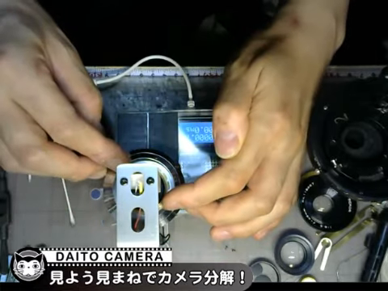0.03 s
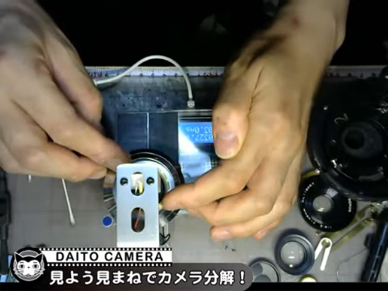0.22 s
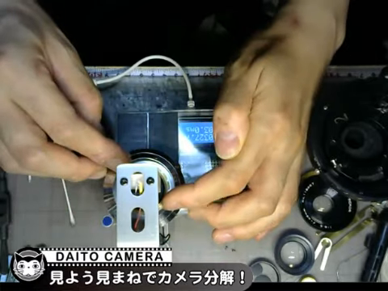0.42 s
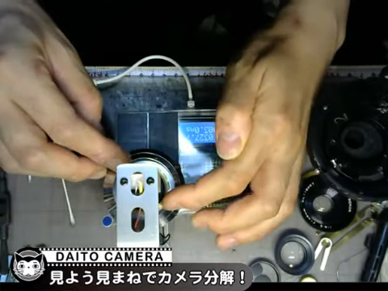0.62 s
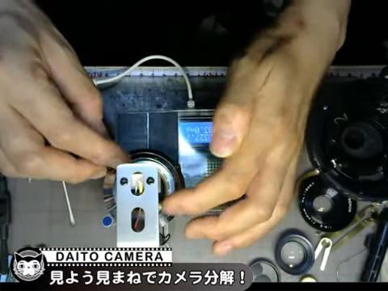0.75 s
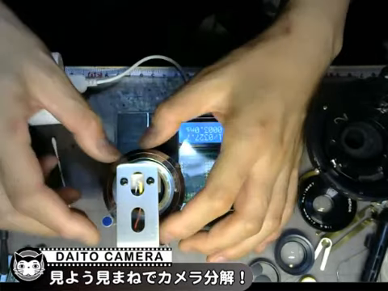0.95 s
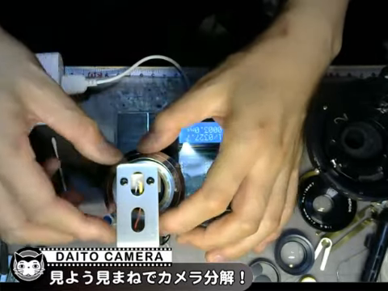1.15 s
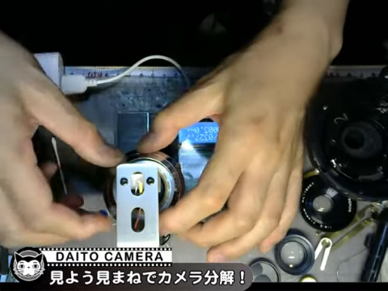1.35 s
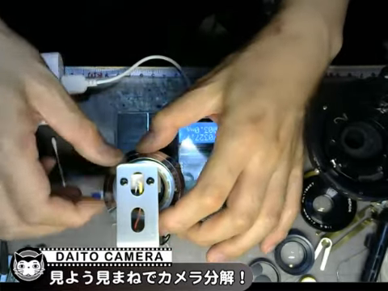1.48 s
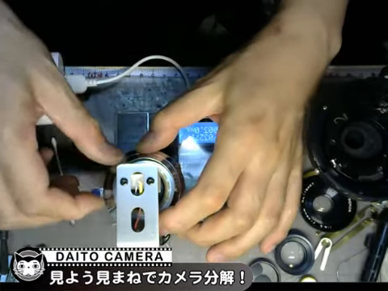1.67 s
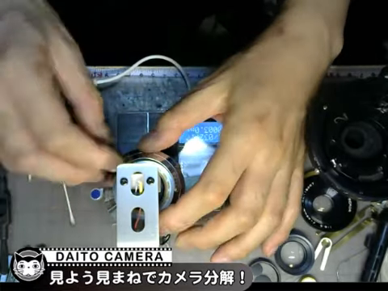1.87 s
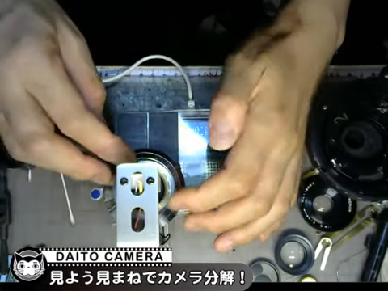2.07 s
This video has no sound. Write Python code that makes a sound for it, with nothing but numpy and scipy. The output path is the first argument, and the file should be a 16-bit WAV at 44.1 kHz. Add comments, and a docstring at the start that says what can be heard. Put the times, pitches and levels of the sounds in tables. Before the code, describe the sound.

A camera lens shutter fires at about 0.2 seconds with one sharp, metallic click, close and much louder than everything else. Faint handling ticks follow near 0.6, 1.1 and 1.4 seconds. Around 1.5 to 1.7 seconds the lens shifts with a short, soft scrape and a few clicks, then ticks lightly near 1.8 and 2 seconds. A faint low rumble of a small room lies underneath.

```python
"""A sharp metallic snap, then light ticks and short scrapes over a low room rumble.
The snap is a camera's leaf shutter on a workbench: the latch lets go, the blades fly open and shut,
and each impact sets the metal and the lens body into damped free vibration. Fingers then shift the
lens, exciting its barrel by contact and by stick-slip friction. A small room adds its reflections,
and a close, narrow-band microphone overloads on the snap."""
import sys
import numpy as np
from scipy import signal
from scipy.fft import rfft, irfft, next_fast_len
from scipy.io import wavfile

SR = 44100
rng = np.random.default_rng(int(sys.argv[2]) if len(sys.argv) > 2 else 0)


def inscribe(sig):
    """Save sig as 16-bit PCM at rate SR to the path in sys.argv[1].

    A 1-D sig is mono; a 2-D sig holds one channel per row.
    Samples are clipped to [-1, 1] before scaling.
    """
    pcm = np.round(np.clip(np.atleast_2d(sig).T, -1, 1) * 32767)
    wavfile.write(sys.argv[1], SR, pcm.astype(np.int16))


N = 92610

# impacts inside the shutter: t/s, metal level/dB, body level/dB, favoured f/Hz
SHUTTER_IMPACTS = [(0.2105, -13, -17.5, 2900), (0.2131, -19.5, -21.5, 2800), (0.2152, -3.5, -2.5, 5404),
                   (0.2167, 1.5, -7.5, 3157), (0.2192, 2.5, -2, 2700), (.2226, -6, -3, 2550),
                   (0.2274, -13, -17.5, 2700), (0.2367, -19, -22, 1950)]
# modes of the shutter's metal: f/Hz, level/dB, T60/s
METAL_MODES = [(1658, -18.5, 0.036), (1975, -21.5, 0.051), (2417, -17, 0.083), (2719, -12, .028),
               (2908, -9.5, 0.01), (3294, -12, 0.035), (3376, -18, 0.0182), (3840, -17.5, .02),
               (5190, -27.5, 0.02), (5670, -22, .025), (6010, -20, .028), (6720, -20.5, .025)]
# modes of the lens body, its stand and the bench: f/Hz, level/dB, T60/s
BODY_MODES = [(114, -44, 0.38), (308, -22, 0.037), (528, -17, .046), (705.5, -18, 0.051),
              (1030, -25, 0.037)]
# spectrum of the blades' rattle: f/Hz, level/dB
RATTLE_SPECTRUM = [(40, -28), (150, -24), (300, -12.5), (500, -8.5), (900, -9.5), (1500, -7), (2900, -4),
                   (4100, -4), (4700, -13.5), (5600, -8), (7200, -7.5)]
# finger touches: t/s, chatter T60/s, chatter level/dB relative to the first contact, favoured f/Hz,
# then level/dB at each of the five tick bands
TOUCHES = [(0.6109, .006, -7, 2700, -63, -65, -46, -48, -58),
           (0.6445, .012, 2, 2750, -60, -54, -42.5, -39, -39),
           (1.0735, 0.015, 4, 3400, -42, -42, -56, -48.5, -61),
           (1.1178, 0.021, 3.5, 420, -44, -56, -54, -50, -73),
           (1.2151, 0.024, -8, 2500, -60, -51, -47, -45, -55),
           (1.3816, .009, -5.5, 3100, -43, -38, -28, -36, -42),
           (1.4162, .008, -1, 2990, -41, -67, -54, -56.5, -55),
           (1.6038, 0.013, 5.5, 3400, -42.5, -31.5, -37, -37, -43.5),
           (1.6114, 0.0064, 11, 3580, -45, -42, -49.5, -38.5, -55),
           (1.6385, 0.034, 7, 3880, -48, -38, -40.5, -32, -34.5),
           (1.6498, 0.02, 2, 2750, -38.5, -40, -29.5, -29.5, -38),
           (1.7633, 0.015, -8, 2850, -39.5, -65, -52, -41, -45),
           (1.8064, 0.0057, -6.5, 1867, -40.5, -50, -30, -36, -50),
           (2.0436, 0.011, 1, 2150, -42, -53, -40, -38.5, -57)]
# tick bands (thud, knock, low ring, middle ring, treble): f/Hz
TOUCH_BANDS_HZ = [500, 1300, 1900, 3200, 6200]
# slides of the barrel in its seat: t/s, T60/s, level/dB, treble gain/dB
SLIDES = [(.622, 0.11, -56.5, -10), (1.5, 0.25, -53.5, 3.5), (1.532, 0.11, -52, -16),
          (1.546, 0.18, -50, -5), (1.574, 0.16, -44, -7), (1.593, 0.13, -39, -5), (1.811, 0.56, -57, -17)]
# modes of the lens barrel: f/Hz, level/dB, T60/s
BARREL_MODES = [(289, -4.5, .03), (575, -3, 0.018), (1413, -2.5, 0.011), (1924, -2, 0.019),
                (2500, -4.5, 0.011), (2780, -4, 0.016), (3140, -6, 0.016), (3361, -7.5, 0.022),
                (3893, -3.5, 0.0084), (5690, -3.5, 0.0061), (6280, -8.5, 0.021), (6920, -2, 0.0033)]
# spectrum of the room's reflections: f/Hz, level/dB
ECHO_SPECTRUM = [(100, -11), (500, -1), (1200, -1.5), (3000, -1.5), (7000, -1.5)]
# spectral density of the room noise: f/Hz, relative level/dB
NOISE_SPECTRUM = [(20, -7), (35, -8.5), (60, -6), (100, -2), (160, -6), (300, -5), (500, -10),
                  (1000, -15.5), (2000, -21.5), (4000, -28.5), (6500, -33.5), (7500, -40.5)]


def shutter():
    """Impact excitation: each blow rings the metal, rattles the blades and nudges the lens body."""
    out, metal, body = np.zeros(N), ring(METAL_MODES), ring(BODY_MODES)
    for start, metal_db, body_db, hz in SHUTTER_IMPACTS:
        rattle = undb(22) * colour(chatter(t60=0.014), RATTLE_SPECTRUM)
        snap = favour(metal + rattle, hz, db=5.5, octaves=.35)
        add(out, start, undb(metal_db) * snap + undb(body_db) * body)
    return out


def ticks():
    """Convolution: the force of a touch and its chatter drives the barrel's impulse response."""
    out, response = np.zeros(N), barrel()
    for start, t60, chatter_db, hz, *band_db in TOUCHES:
        force = undb(chatter_db) * chatter(t60)
        force[0] += 1  # first contact
        vibration = signal.fftconvolve(force, response)[:N // 4]
        tick = favour(vibration, hz, db=6.5, octaves=0.2)
        add(out, start, colour(tick, list(zip(TOUCH_BANDS_HZ, band_db))))
    return out


def scrapes(slips_per_s=4000, attack_s=0.0012):
    """Stick-slip friction: the barrel breaks free in jerks, each a dying train of tiny slips."""
    out, response, size = np.zeros(N), barrel(), N // 4
    attack = 1 - np.exp(-np.arange(size) / SR / attack_s)
    for start, t60, db, treble_db in SLIDES:
        slips = (rng.random(size) < slips_per_s / SR) * rng.standard_normal(size)
        vibration = signal.fftconvolve(slips, response)[:size]
        rasp = colour(vibration, [(500, -11), (1900, -2), (3400, 1), (6000, treble_db)])
        add(out, start, undb(db) * rasp / rasp.std() * attack * fade(t60))
    return out


def barrel():
    """Impulse response of a small radiator: a crack and short-lived modes, weak in the bass."""
    response = ring(BARREL_MODES)
    response[0] += undb(8.5)  # the crack
    return colour(response, [(100, -12), (300, 0)])


def ring(modes):
    """Modal superposition: damped sinusoids after one tap, neighbours in opposite phase."""
    t = np.arange(N // 4) / SR
    return sum((-1) ** k * undb(db) * np.sin(2 * np.pi * hz * t) * fade(t60)
               for k, (hz, db, t60) in enumerate(modes))


def chatter(t60):
    """Broadband excitation: a dying run of tiny contacts, of even spectrum and unit energy."""
    phase = np.angle(rfft(burst(t60)))
    contacts = irfft(np.exp(1j * phase), N // 4) * fade(10 * t60)
    return contacts / np.linalg.norm(contacts)


def favour(x, hz, db, octaves):
    """Selective excitation: the point of contact lifts the modes within `octaves` either side of hz."""
    return colour(x, [(hz / 2 ** octaves, 0), (hz, db), (hz * 2 ** octaves, 0)])


def room(direct, build_s=.008):
    """Reverberation: quick reflections from the bench and a faint tail from the walls."""
    build = 1 - np.exp(-(np.arange(N // 4) / SR / build_s) ** 2)
    early = undb(-11.5) * burst(t60=.115)
    late = undb(-35) * burst(t60=.25)
    echo = colour(build * (early + late), ECHO_SPECTRUM)
    return direct + signal.fftconvolve(direct, echo)[:N]


def room_noise(rms_db=-53):
    """Stationary noise: the workshop's low rumble and faint hiss."""
    noise = colour(rng.standard_normal(N), NOISE_SPECTRUM)
    return noise / noise.std() * undb(rms_db)


def colour(x, points):
    """Minimum-phase filtering: a causal response through (f/Hz, level/dB) points."""
    hz, db = np.array(points).T
    size = 2 * next_fast_len(len(x))
    f = np.maximum(np.fft.rfftfreq(size, 1 / SR), 1)
    gain = undb(np.interp(np.log(f), np.log(hz), db))
    cepstrum = irfft(np.log(gain))
    cepstrum[1:size // 2] *= 2  # fold onto positive time
    cepstrum[size // 2 + 1:] = 0
    return irfft(rfft(x, size) * np.exp(rfft(cepstrum)))[:len(x)]


def burst(t60):
    """Damped white noise of unit energy."""
    noise = rng.standard_normal(N // 4) * fade(t60)
    return noise / np.linalg.norm(noise)


def fade(t60):
    """Exponential damping: 60 dB in t60 seconds."""
    return np.exp(-np.log(1000) * np.arange(N // 4) / SR / max(t60, 1e-4))


def undb(db):
    """Amplitude ratio of a level in decibels."""
    return 10 ** (np.asarray(db) / 20)


def add(out, start, x):
    """Superposition: x joins the mix at `start` seconds."""
    i = int(start * SR)
    out[i:i + len(x)] += x[:N - i]


def scene():
    """Linear superposition: shutter and handling sound in one room, over its steady noise."""
    return (room(shutter() + ticks() + scrapes()) + room_noise())[None]


def record(dry, mic_top_hz=7222, overload=.78, top_hz=16000, dc_offset=.0061):
    """Band limiting and saturation: a narrow-band microphone, soft clipping, a top cut and an offset."""
    mic = signal.sosfilt(signal.ellip(8, .3, 70, mic_top_hz, fs=SR, output="sos"), dry)
    clipped = mic / (1 + (mic / overload) ** 8) ** (1 / 8)
    top_cut = signal.ellip(8, .1, 60, top_hz, fs=SR, output="sos")
    return signal.sosfiltfilt(top_cut, clipped) + dc_offset


dry = scene()
out = record(dry)
inscribe(out)
```